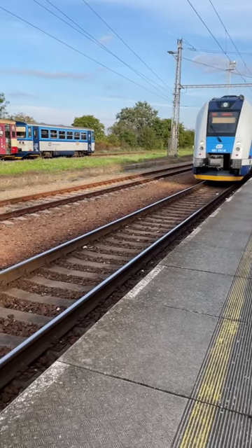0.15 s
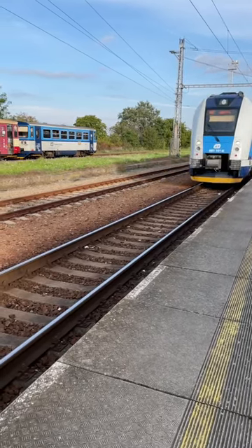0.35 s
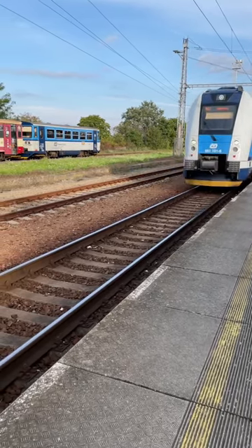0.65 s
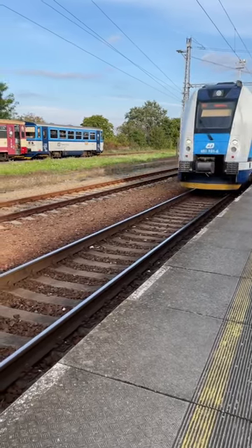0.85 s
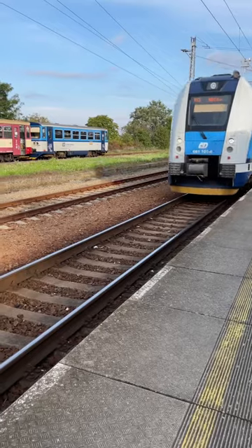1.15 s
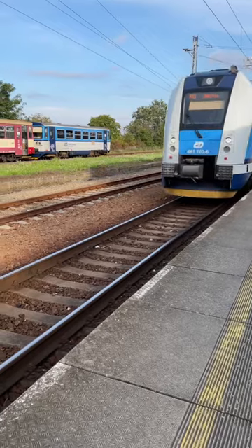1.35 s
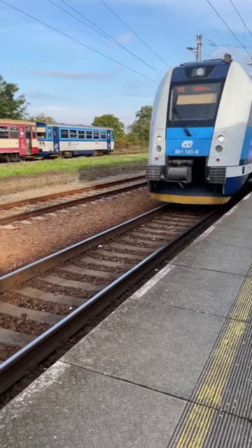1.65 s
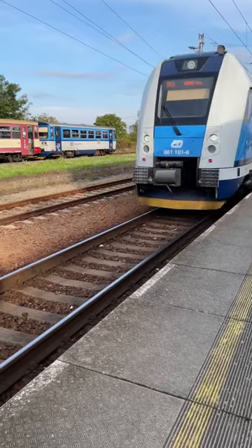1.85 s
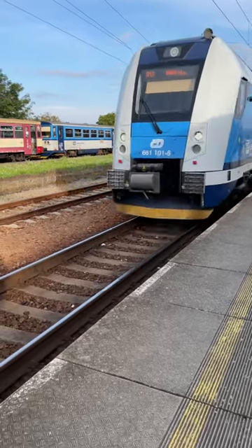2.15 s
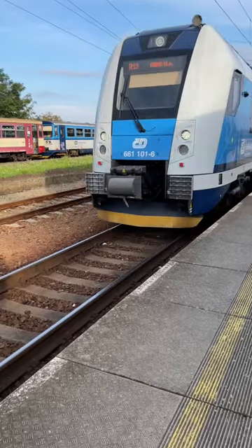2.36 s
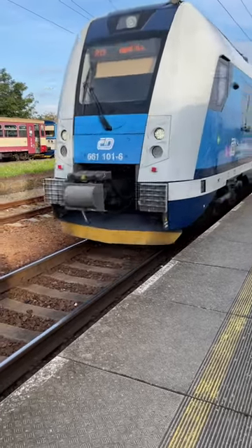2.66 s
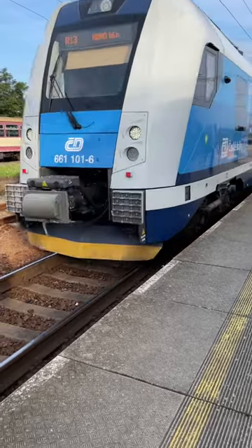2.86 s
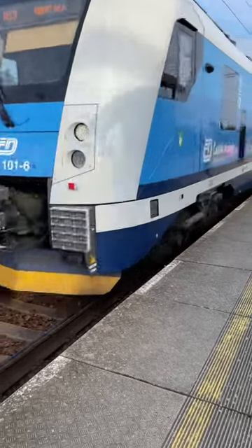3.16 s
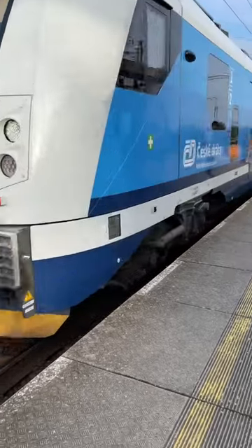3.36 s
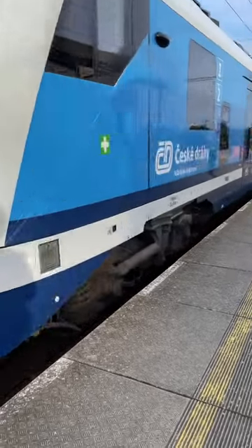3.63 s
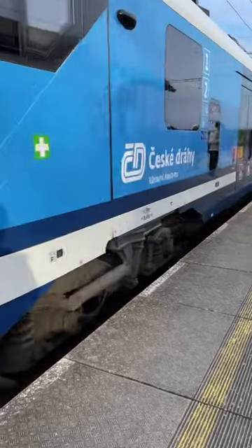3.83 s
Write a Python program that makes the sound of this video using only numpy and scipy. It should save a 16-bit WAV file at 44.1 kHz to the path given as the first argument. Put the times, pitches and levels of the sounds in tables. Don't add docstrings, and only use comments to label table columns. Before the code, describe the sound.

An electric train approaches an open-air platform; low rumble and humming rails swell into a close roar with soft joint thumps, motor whine and short squeaks, the whine sagging as it passes a close stereo microphone.

```python
import sys
import numpy as np
from scipy import signal
from scipy.fft import rfft, irfft, next_fast_len
from scipy.io import wavfile

SR = 44100
rng = np.random.default_rng(int(sys.argv[2]) if len(sys.argv) > 2 else 0)


def undo_db(level):
    steps = np.asarray(level, float) / 20
    return 10 ** steps


def to_wav(sig):
    pcm = np.clip(np.atleast_2d(sig), -1, 1) * 32767
    pcm = np.round(pcm).astype(np.int16)
    wavfile.write(sys.argv[1], SR, pcm.T)


N = 175959

# (time [s], level [dB])
APPROACH = [(0.0, -41), (1.41, -36), (1.57, -36), (1.83, -35), (2.94, -31), (3.24, -31.5), (3.99, -27.5)]
# (frequency [Hz], level [dB per Hz])
FAR_RUMBLE = [(42, -4.5), (180, -1), (320, -8), (720, -25), (1700, -25), (3000, -32.5), (4500, -38),
              (7500, -44)]
# (frequency [Hz], level [dB per Hz])
NEAR_ROLL = [(40, -13), (115, -4.5), (320, -8.5), (600, -13), (1300, -25.5), (2600, -30.5), (4500, -38),
             (7500, -37.5)]
# (time [s], level [dB], pitch [Hz])
JOINTS = [
    (0.829, -20.5, 102),
    (1.103, -18, 77),
    (1.509, -25.5, 86),
    (1.583, -19, 169),
    (2.229, -15.5, 76.5),
    (2.758, -20, 63),
    (2.766, -20, 173),
]
# (multiple of the pitch [-], level [dB], share of the approach [-], width [Hz])
WHINE = [(1, -47, 0.69, 9.1), (2, -45, 0.69, 27.4), (3, -58, 1, 23), (4, -60.5, 1, 46),
         (5, -57.5, 0.88, 59), (6, -59, .9, 72), (7, -89, 0.99, 60), (8, -73, 0.99, 70)]
HUM_HZ = [122, 170, 228, 343.5, 491, 790, 918, 980, 1400, 1807]
# (width [Hz], level [dB], share of the approach [-])
HUMS = [(20, -38.5, 0.9), (35.3, -39, 0.17), (35, -43, 0.56), (10.9, -31, 0.92), (8.8, -41.5, 0.74),
        (11.1, -56, 0.15), (20, -54, 1.7), (20, -55, 0.81), (40, -52.5, 1.1), (5.04, -50.5, 0.6)]
# (middle [s], length [s], level [dB], pitch [Hz])
SQUEAKS = [(.54, 0.088, -46, 1960), (0.962, 0.052, -47, 2010), (1.03, 0.083, -46, 1985),
           (1.497, 0.077, -39, 1968), (2.575, 0.088, -37, 1970), (2.628, 0.056, -41, 1940),
           (2.708, 0.042, -34, 1930), (2.756, 0.027, -44, 1860), (3.124, .04, -38.5, 1990),
           (3.186, 0.047, -32, 1993), (3.221, 0.051, -30, 1953), (3.27, 0.079, -40, 1955),
           (3.795, 0.036, -39, 2055), (3.817, .035, -36, 2000), (3.867, 0.055, -30, 1935),
           (3.918, 0.041, -33, 1970)]
# (middle [s], length [s], level [dB], pitch [Hz])
WHISTLES = [
    (1.51, .06, -50, 7900),
    (3.4, 0.068, -61, 2900),
    (1.96, 0.059, -58.5, 4120),
    (1.8, 0.078, -55, 4050),
    (0.06, 0.4, -52.5, 1200),
    (2.93, 0.17, -31, 918),
    (2.1, 0.28, -40, 980),
    (2.08, .12, -30.5, 490),
]
# (frequency [Hz], phase lead [radians])
LEFT_LEAD = [(350, 0), (850, -.9), (1300, -.25), (1850, 0), (3300, .75), (5800, .45), (9300, 3.05),
             (10800, 3.2), (12800, 4.4)]
# (frequency [Hz], left over right [dB], opposed echo [dB])
PORTS = [(70, -0.5, -28), (152, 0.5, -27), (367, 4, -19.5), (835, -1, -4), (1760, -1, -22),
         (2880, -2, -8.5), (4950, 1, -2.5), (10370, -0.5, -15), (13300, 0, 0)]


def rms_one(x):
    return x / np.sqrt(np.mean(np.abs(x) ** 2) + 1e-20)


def drift(hz):
    r = np.exp(-16 * np.pi * hz / SR)
    noise = rng.standard_normal(N // 8 + 4002)
    slow = signal.lfilter([1], [1, -2 * r, r * r], noise)[4000:]
    return np.interp(np.arange(N) / 8, np.arange(len(slow)), rms_one(slow))


def fuzzy_tone(phase, width_hz, steady):
    return rms_one((steady + drift(width_hz)) * np.cos(phase) + drift(width_hz) * np.sin(phase))


def read_table(table, hz, column):
    rows = np.array(table)
    return np.interp(np.log(hz), np.log(rows[:, 0]), rows[:, column])


def rolling(near_db):
    rumble_db, rumble_follows = -48, 0.14
    roll_db, roll_follows = -46, 1.13
    patchy_db, smooth_above_hz = 1.5, 1200
    treble_from_hz, treble_db_per_octave = 8260, -26
    far_power = undo_db(2 * (rumble_db + rumble_follows * near_db))
    near_power = undo_db(2 * (roll_db + roll_follows * near_db))
    together = drift(2.5)
    white = rng.standard_normal((2, N + SR))
    edges = 22 * 2 ** np.arange(0, 9.5, 1 / 3)
    out = 0
    for k, (low, high) in enumerate(zip(edges, edges[1:])):
        band_filter = signal.butter(2, [low, high], "band", fs=SR, output="sos")
        band = signal.sosfilt(band_filter, white[k % 2])[SR:]
        hz = np.sqrt(low * high)
        power = far_power * undo_db(2 * read_table(FAR_RUMBLE, hz, 1))
        power = power + near_power * undo_db(2 * read_table(NEAR_ROLL, hz, 1))
        flicker_db = patchy_db / (1 + hz / smooth_above_hz) * (.5 * together + drift(8))
        treble_db = treble_db_per_octave * max(0, np.log2(hz / treble_from_hz))
        out = out + np.sqrt(power) * undo_db(treble_db + flicker_db + 40.5) * band
    return out


def joints(t):
    rise_s, fall_s = 0.0099, .025
    out = 0
    for s, db, hz in JOINTS:
        shape = np.exp(-np.where(t < s, (s - t) / rise_s, (t - s) / fall_s) ** 2)
        out = out + undo_db(db) * np.sin(2 * np.pi * hz * (t - s)) * shape
    return out


def whine(t, near_db):
    start_hz, sag_start_s, sag_knee_s, sag_hz_per_s = 1550.3, 2.87, .08, 140
    abreast_s, abreast_rise_s, abreast_db = 3.54, 0.09, 3
    twin_ratio, twin_db = .99, -1.5
    skirt_ratio, skirt_width_hz, skirt_db = .94, 120, -11
    pitch = start_hz - sag_hz_per_s * sag_knee_s * np.logaddexp(0, (t - sag_start_s) / sag_knee_s)
    phase = 2 * np.pi * np.cumsum(pitch) / SR
    swell = undo_db(abreast_db / (1 + np.exp((abreast_s - t) / abreast_rise_s)))
    out = 0
    for k, db, share, width_hz in WHINE:
        motor = fuzzy_tone(k * phase, width_hz, steady=0.86)
        twin = undo_db(twin_db) * fuzzy_tone(k * twin_ratio * phase, width_hz, steady=0.96)
        skirt = undo_db(skirt_db) * fuzzy_tone(k * skirt_ratio * phase, skirt_width_hz * k, steady=0)
        out = out + undo_db(db + share * near_db) * (motor + twin + skirt)
    return swell * out


def hums(t, near_db):
    out = 0
    for hz, (width_hz, db, share) in zip(HUM_HZ, HUMS):
        out = out + undo_db(db + share * near_db) * fuzzy_tone(2 * np.pi * hz * t, width_hz, steady=2.55)
    return out


def bursts(t, rows, fall_hz_per_s, width_hz, overtones_db):
    grit = 0.81 + (drift(width_hz) + 1j * drift(width_hz)) * 0.65
    out = 0
    for s, length, db, hz in rows:
        phase = 2 * np.pi * (hz - .5 * fall_hz_per_s * (t - s)) * (t - s) + np.angle(grit)
        shape = np.exp(-(2 * (t - s) / length) ** 2) * np.abs(grit)
        for k, overtone_db in enumerate(overtones_db):
            level = undo_db(db + 3 + overtone_db + 0.13 * k * (db + 22))
            out = out + shape ** (1 + k / 2) * level * np.sin((k + 1) * phase)
    return out


def squeaks(t):
    return bursts(t, SQUEAKS, fall_hz_per_s=550, width_hz=41, overtones_db=[0, -15.5, -20])


def whistles(t):
    return bursts(t, WHISTLES, fall_hz_per_s=-35, width_hz=23, overtones_db=[0])


def across_the_tracks(x):
    echo_s = .21
    return x[np.abs(np.arange(N) - int(echo_s * SR))]


def ports(x, echo):
    dip_hz, dip_width_hz, dip_db = 4950, 230, -6
    size = next_fast_len(N + SR // 4)
    f = np.arange(size // 2 + 1) * SR / size + 1
    half = undo_db(read_table(PORTS, f, 1) / 2) * np.exp(.5j * read_table(LEFT_LEAD, f, 1))
    direct = rfft(x, size) * undo_db(dip_db * np.exp(-((f - dip_hz) / dip_width_hz) ** 2))
    opposed = rfft(echo, size) * undo_db(read_table(PORTS, f, 2))
    left = half * (direct + opposed)
    right = (direct - opposed) / half
    return irfft([left, right], size)[:, :N]


def scene():
    t = np.arange(N) / SR
    s, db = np.transpose(APPROACH)
    near_db = np.interp(t, s, db - db.mean())
    steady = rolling(near_db) + whine(t, near_db) + hums(t, near_db)
    train = steady + joints(t) + squeaks(t) + whistles(t)
    return ports(train, across_the_tracks(steady))


def roll_off(x):
    return signal.sosfilt(signal.butter(12, 13880, fs=SR, output="sos"), x)


def record(dry):
    low_cut = signal.butter(6, 44, "high", fs=SR, output="sos")
    mix = signal.sosfilt(low_cut, dry)
    return roll_off(mix)


dry = scene()
out = record(dry)
to_wav(out)
```